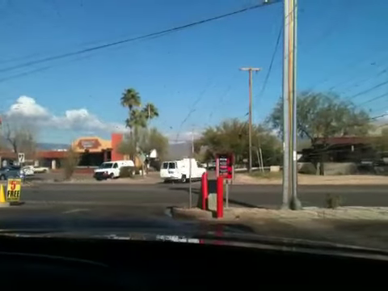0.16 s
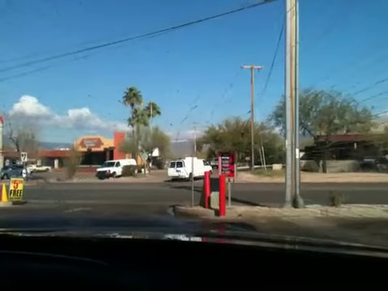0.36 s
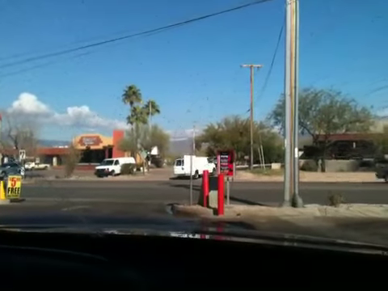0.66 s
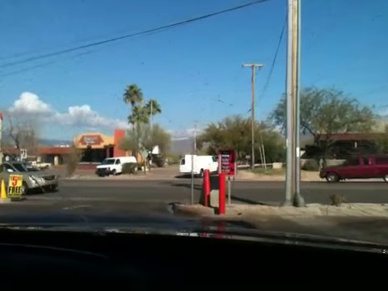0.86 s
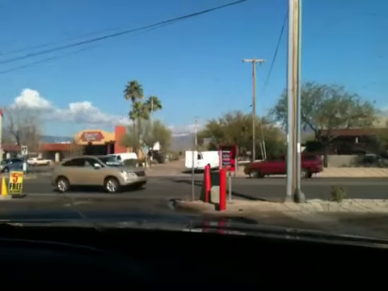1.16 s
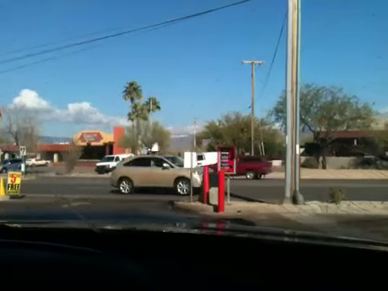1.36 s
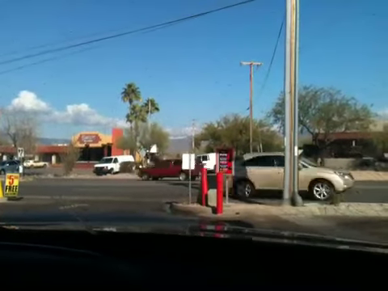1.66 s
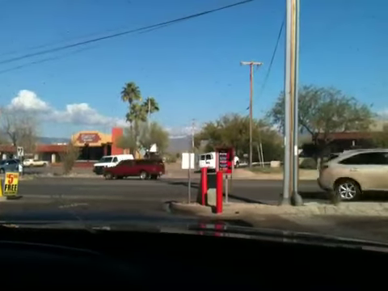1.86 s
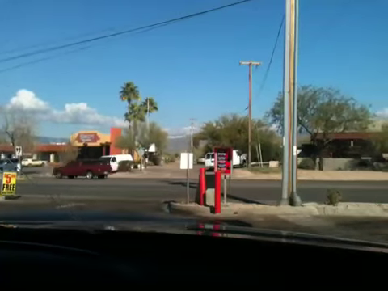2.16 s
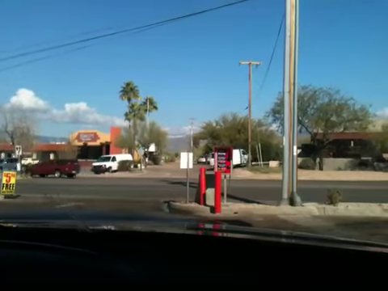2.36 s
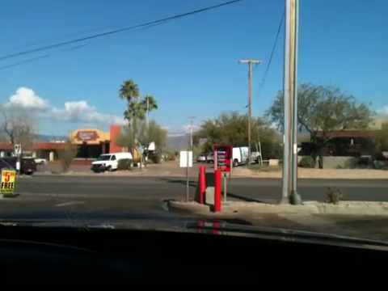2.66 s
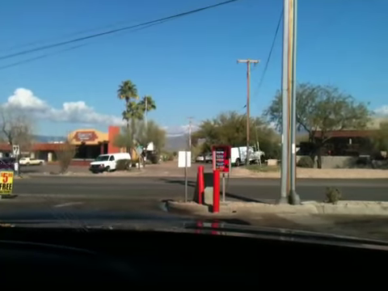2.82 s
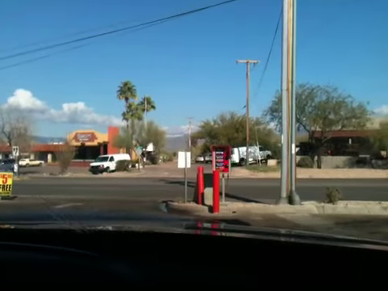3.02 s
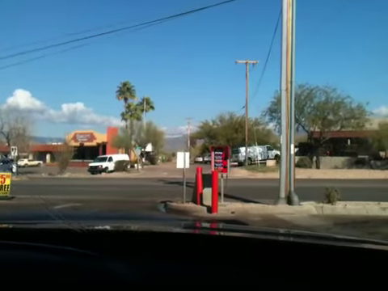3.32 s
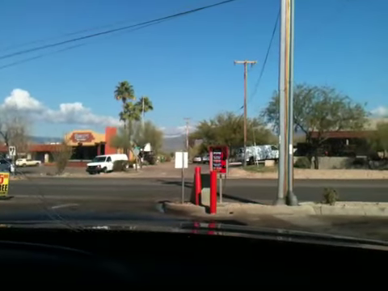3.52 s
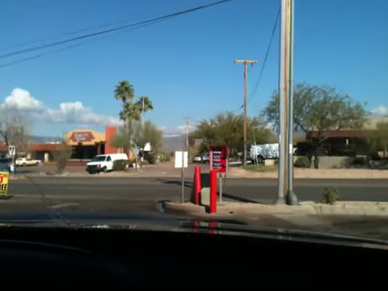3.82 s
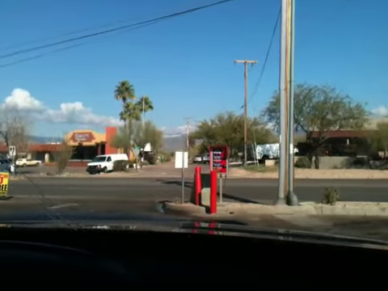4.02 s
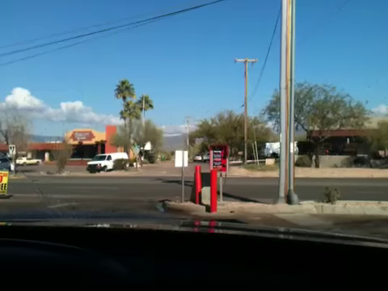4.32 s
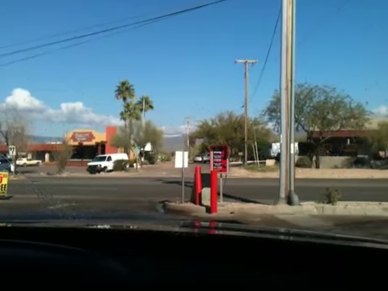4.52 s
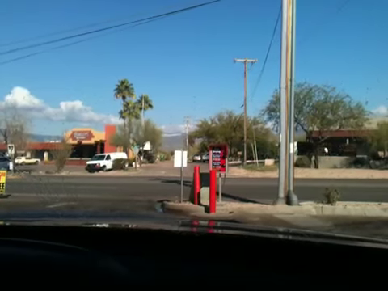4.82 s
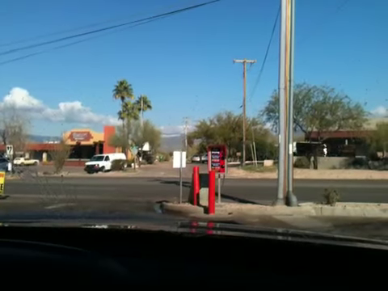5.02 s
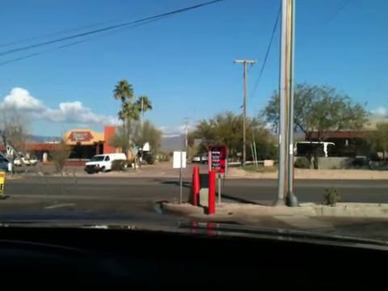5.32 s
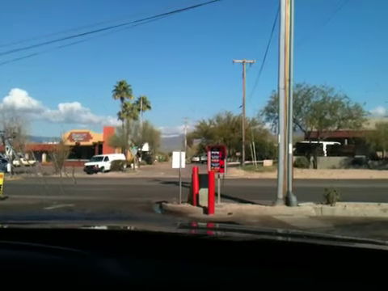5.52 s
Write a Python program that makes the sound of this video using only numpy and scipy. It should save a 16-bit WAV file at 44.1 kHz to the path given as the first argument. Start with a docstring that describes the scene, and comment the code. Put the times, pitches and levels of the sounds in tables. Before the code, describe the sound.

Inside a parked car, a muffled low roar of dryer air rumbles on, small metal jingles briefly, then panels drum louder.

```python
"""Car wash dryer blowers rush over a closed car, heard from the cabin.
From the start: noise-band rumble and rush, resonant roof drumming, seal hiss and a very faint sine whine.
Small metal, like keys, chinks within the first second (noise-struck modes); bright noise puffs come and go.
The roof drums harder from about 2.5 s to the end; a blurred fan tone comes up near 4 s.
One more faint chink, slightly spread, follows shortly after."""
import sys
import numpy as np
from scipy import signal
from scipy.io import wavfile
from scipy.ndimage import uniform_filter1d

SR = 44100
rng = np.random.default_rng(int(sys.argv[2]) if len(sys.argv) > 2 else 0)


def digitize_waveform(pressure):
    """Quantize a signal to 16-bit integers and store it at the path in sys.argv[1].

    Rows of a 2-D input are taken as channels; values are limited to [-1, 1].
    """
    field = np.atleast_2d(pressure).T
    bounded = np.clip(field, -1, 1)
    quanta = np.round(bounded * 32767).astype(np.int16)
    wavfile.write(sys.argv[1], SR, quanta)


N = 250488  # samples

# Large-eddy spectrum: freq_hz, gain_db
RUMBLE_SPECTRUM = [(15, -68.5), (25, -48), (65, -20.5), (94, -13), (113, 1), (167, 0), (212, -7),
                   (260, -0.5), (340, -41.5), (570, -120)]
# Rumble over time: time_s, level_db (90-220 Hz, before tilt and wobbles), tilt_db_per_octave
RUMBLE_CURVE = [(0, -29.5, 1.5), (.45, -30.5, -1.5), (.65, -30.5, -0.5), (.75, -32.5, -2.5),
                (1.15, -34, -1.5), (1.4, -31, -4), (1.75, -32.5, -1), (2.2, -31.5, -1), (3.0, -32, -2),
                (3.7, -32, 2.5), (4.3, -32.5, 1), (5.1, -28.5, 2.5), (5.4, -29.5, -0.5), (5.68, -29.5, 3)]
# Brief level wobbles of the low noise and main panel: centre_s, rumble_change_db, panel_change_db
WOBBLES = [(0.5, 3.5, 0), (0.59, 6, 0), (1.0, 6, 2), (2.52, 5, 2), (3.74, 2.5, 8), (4.04, -4, 8.5),
           (4.42, 5.5, 7), (5.47, 3, 5), (5.58, 2, 4)]
WOBBLE_HALF_WIDTH_S = 0.023  # change in dB is down to 1/e here
# Cabin resonances colouring rumble and rush: centre_hz, width_hz, lift_db
CABIN_MODES = [(110.4, 29, 4.5), (177.2, 19, 6), (443.4, 21, 6), (700, 25, 5), (1010, 40, 0), (1180, 11, 8),
               (1390, 19, 1.5), (2650, 370, -5), (3800, 1200, 6.5)]

# Roof and door panel resonances: centre_hz, width_hz, gain_db
ROOF_MODES = [(178.5, 58, -2.5), (242, 38, -12), (282, 26, -0.5), (340, 34, -1.5), (392.5, 30.3, 2.5),
              (436.5, 22, 0), (498, 34, -7), (536, 41, -9.5), (599, 27, -13), (880, 22, -24.5),
              (933, 28, -15.5)]
# Roof over time: time_s, drumming_db (340-520 Hz), main_panel_db (285-330 Hz, before wobbles)
ROOF_CURVE = [(0.0, -39, -38), (.3, -37.5, -53), (0.7, -42.5, -53), (1.5, -37, -45), (2.0, -41, -42),
              (2.3, -38.5, -35.5), (3.4, -34, -33), (4.0, -32, -29.5), (4.5, -29.5, -32.5),
              (4.9, -28.5, -30.5), (5.15, -31, -34), (5.33, -28, -35), (5.5, -28.5, -28.5),
              (5.68, -28.5, -26.5)]
PANEL_HZ, PANEL_WIDTH_HZ = 307, 25
PANEL_WANDER = 0.018  # rms random pitch drift, as a share of pitch

# Nozzle roar spectrum: freq_hz, gain_db
RUSH_SPECTRUM = [(120, -59), (200, 0), (220, -3.5), (316, 0.5), (362, -13.5), (392, -8.5), (437, -4),
                 (557, -8), (719, -9), (904, -15), (1800, -22.5), (2110, -25.5), (5000, -54), (6500, -68),
                 (11000, -120)]
# Rush over time: time_s, level_db (600-3000 Hz, before tilt), tilt_db_per_octave
RUSH_CURVE = [(0.0, -37, -3), (0.5, -39.5, -0.5), (.95, -39, -.5), (1.35, -40, 2), (1.7, -40, -1),
              (2.5, -40, -0.5), (3.2, -40, 2), (3.9, -41, 1), (4.4, -38.5, 0), (5.0, -38, .5),
              (5.4, -39.5, 1.5), (5.68, -37.5, 1)]

# Seal hiss spectrum: freq_hz, gain_db
HISS_SPECTRUM = [(2060, -4.5), (3500, -2.5), (4700, -8), (6000, -12.5), (7800, -16.5), (10300, -21.5),
                 (14300, -31), (14600, -28.5), (15600, -29.5)]
# Hiss over time: time_s, level_db (5-9 kHz, before tilt), tilt_db_per_octave
HISS_CURVE = [(0.0, -59.5, 1.5), (1.16, -64, -0.5), (2.97, -65.5, -0.5), (4.13, -64.5, -1),
              (4.98, -63.5, -1), (5.62, -63, -1.5)]

FAN_HZ, FAN_WIDTH_HZ = 988, 9
# Blower tone over time: time_s, level_db (950-1020 Hz)
FAN_CURVE = [(0, -65), (3.9, -58), (4.4, -52), (5.0, -51), (5.68, -50)]

# Electronic whine: pitch_hz, rms_db
WHINE_TONES = [(14912, -100), (14971, -91), (15030, -90), (15089, -100), (15622, -104)]

# Ringing modes of the small metal: pitch_hz, offset_db, t60_s
KEY_MODES = [(4400, -1, .012), (5600, -5, .012), (7500, 0, .04), (7950, -1.5, .04), (9200, -4, .015),
             (9900, -2, .015), (10500, 0, .02), (11300, 2, .015), (12020, 3, .06), (12705, -8, .05),
             (14500, -12, .03), (14950, 2, .03), (15300, -12, .03)]
# Mode-group index (0-4) of each row of KEY_MODES
KEY_GROUPS = [0, 0, 0, 0, 1, 1, 1, 1, 2, 3, 4, 4, 4]
# Contacts: start_s, length_s, lowest_db, middle_db, main_db, upper_db, top_db (peaks before offset_db)
CHINKS = [(.04, .02, -80, -80, -62, -78, -80), (.517, .012, -55, -61, -62, -78, -76),
          (.530, .018, -62, -71, -63, -80, -72), (.552, .014, -60, -72, -73, -80, -78),
          (.600, .014, -68, -65, -64, -78, -74), (.613, .012, -66, -73, -66, -78, -69),
          (.627, .012, -68, -70, -64, -70, -70), (.639, .018, -59, -62, -54, -55, -63),
          (.655, .014, -67, -68, -63, -59, -66), (.774, .016, -69, -67, -68, -72, -65),
          (.787, .012, -62, -56, -57, -60, -54), (.795, .012, -51, -58, -56, -59, -49),
          (.804, .01, -55, -59, -65, -63, -49), (.811, .011, -58, -57, -64, -65, -58),
          (.821, .01, -61, -67, -73, -74, -61), (4.275, .025, -82, -74, -67, -72, -80),
          (4.295, .025, -82, -76, -70, -74, -80)]

# Puff spectrum: freq_hz, gain_db
PUFF_SPECTRUM = [(2500, -19), (4500, 0), (7500, 8), (11000, 1), (15500, -11)]
# Short bright noise puffs; the one at 0.79 s belongs to the key clash: time_s, gain_db
PUFFS = [(.516, -60), (.79, -54), (1.885, -59), (3.165, -59), (3.68, -63), (4.375, -58), (5.015, -60)]

MIC_CUTOFF_HZ, RECORDER_CUTOFF_HZ = 74, 15760


def amp(db):
    """Amplitude gain of a level in dB."""
    return 10 ** (np.asarray(db) / 20)


def evened(x):
    """Scale to rms 1."""
    return x / np.sqrt(np.mean(x ** 2) + 1e-20)


def smooth_noise(shape, size):
    """Running mean of white noise along the first axis, rms 1."""
    return evened(uniform_filter1d(rng.standard_normal(shape), size=size, axis=0))


def spectrum_gain(points, hz):
    """Gain of a spectrum table, in dB linear over log frequency."""
    freq_hz, gain_db = np.transpose(points)
    return amp(np.interp(np.log(hz + 1), np.log(freq_hz + 1), gain_db))


def along(table, column):
    """Gain at every sample from a dB column over time."""
    rows = np.array(table)
    return amp(np.interp(np.arange(N) / SR, rows[:, 0], rows[:, column]))


def peak(hz, centre_hz, width_hz):
    """Resonance shape, 1 at its centre and 1/2 at half a width away."""
    return 1 / (1 + (2 * (hz - centre_hz) / width_hz) ** 2)


def turbulence(shape, band_hz, size, patchy_db, flicker_db, swell_db=0, wander=0):
    """Random-phase noise, rms 1 in the band; patches, flicker, swell (rms dB) and pitch drift at random."""
    hop = size // 4
    frames, hz = N // hop + 12, np.fft.rfftfreq(size, 1 / SR)
    real, imag = rng.standard_normal((2, len(hz), frames))
    patches = evened(uniform_filter1d(smooth_noise((len(hz), frames), size=8), size=6, axis=1))
    flicker = smooth_noise(frames, size=3)
    slow_frames = SR // 4 // hop  # about 0.25 s
    swell = smooth_noise(frames, slow_frames)
    drift = smooth_noise(frames, slow_frames)

    power = shape(hz) ** 2
    in_band = (hz > band_hz[0]) & (hz < band_hz[1])
    band_share = np.sum(power[in_band]) / np.sum(power)
    gain = shape(hz[:, None] * (1 + wander * drift))
    level_db = patchy_db * patches + flicker_db * flicker + swell_db * swell
    z = (real + 1j * imag) * gain * amp(level_db)
    noise = signal.istft(z, nperseg=size, noverlap=size - hop)[1][size:size + N]
    return evened(noise) / np.sqrt(band_share)


def shaped(x, table, pivot_hz, reach_octaves):
    """Level and brightness over time: the spectrum tips about the pivot, flat beyond the reach."""
    hz, time_s, z = signal.stft(x, SR, nperseg=2048)
    rows = np.array(table)
    octaves = np.clip(np.log2((hz + 1) / pivot_hz), -reach_octaves, reach_octaves)
    tilt_db = np.outer(octaves, np.interp(time_s, rows[:, 0], rows[:, 2]))
    tilted = signal.istft(z * amp(tilt_db), nperseg=2048)[1][:N]
    return along(table, column=1) * tilted


def cabin(hz):
    """Cabin air and trim: resonant lifts and a dip on a flat response."""
    return amp(sum(db * peak(hz, f, w) for f, w, db in CABIN_MODES))


def wobbles(column):
    """Gain of the brief level wobbles, each a bell in dB."""
    t = np.arange(N) / SR
    change_db = sum(row[column] * np.exp(-((t - row[0]) / WOBBLE_HALF_WIDTH_S) ** 2) for row in WOBBLES)
    return amp(change_db)


def rumble():
    """Large eddies press on the whole body: low noise coloured by the cabin."""
    def shape(hz):
        return spectrum_gain(RUMBLE_SPECTRUM, hz) * cabin(hz)
    eddies = turbulence(shape, (90, 220), size=4096, patchy_db=0.5, flicker_db=0.27)
    return wobbles(column=1) * shaped(eddies, RUMBLE_CURVE, pivot_hz=145, reach_octaves=1)


def roof():
    """Panels ring on the buffeting: noise in narrow resonances; the main panel has its own level."""
    def modes(hz):
        power = sum(amp(2 * db) * peak(hz, f, w) ** 1.7 for f, w, db in ROOF_MODES)  # steep skirts
        return np.sqrt(power)

    def main_mode(hz):
        return peak(hz, PANEL_HZ, PANEL_WIDTH_HZ)
    drumming = turbulence(modes, (340, 520), size=8192, patchy_db=0.7, flicker_db=0, wander=PANEL_WANDER)
    panel = turbulence(main_mode, (285, 330), size=8192, patchy_db=0.5, flicker_db=0.3, wander=PANEL_WANDER)
    main_panel = along(ROOF_CURVE, column=2) * wobbles(column=2) * panel
    return along(ROOF_CURVE, column=1) * drumming + main_panel


def rush():
    """Nozzle roar dulled by the glass: noise falling towards the treble, coloured by the cabin."""
    def shape(hz):
        return spectrum_gain(RUSH_SPECTRUM, hz) * cabin(hz)
    roar = turbulence(shape, (600, 3000), size=4096, patchy_db=1.22, flicker_db=0.25, swell_db=0.19)
    return shaped(roar, RUSH_CURVE, pivot_hz=1000, reach_octaves=0.46)


def seals():
    """Air whipping past the window seals: high noise with fast patches."""
    def shape(hz):
        return spectrum_gain(HISS_SPECTRUM, hz)
    hiss = turbulence(shape, (5000, 9000), size=512, patchy_db=1.07, flicker_db=0.5, swell_db=0.3)
    return shaped(hiss, HISS_CURVE, pivot_hz=6500, reach_octaves=2.5)


def fan():
    """Blade tone blurred into a narrow noise band, coming up as a blower nears."""
    def shape(hz):
        return peak(hz, FAN_HZ, FAN_WIDTH_HZ)
    tone = turbulence(shape, (950, 1020), size=8192, patchy_db=0.5, flicker_db=1.5, wander=0.0037)
    return along(FAN_CURVE, column=1) * tone


def whine():
    """Thin steady sines of some electronics, at random phases."""
    t = np.arange(N) / SR
    return sum(np.sqrt(2) * amp(db) * np.sin(2 * np.pi * (hz * t + rng.random())) for hz, db in WHINE_TONES)


def keys():
    """Small metal: each swelling, fading rattle of noise contacts rings the same decaying modes."""
    out, t = np.zeros(N + SR), np.arange(SR // 8) / SR
    for start_s, length_s, *group_db in CHINKS:
        swell = np.sin(np.pi * np.clip(t / length_s, 0, 1) ** 0.73) ** 2
        at = round(start_s * SR)
        for (hz, offset_db, t60_s), group in zip(KEY_MODES, KEY_GROUPS):
            roughness = amp(4.0 * smooth_noise(len(t), size=60))
            contacts = swell * rng.standard_normal(len(t)) * roughness
            mode = amp(-60 * t / t60_s) * np.sin(2 * np.pi * hz * t)
            ring = signal.fftconvolve(contacts, mode)[:len(t)]
            out[at:at + len(t)] += amp(offset_db + group_db[group]) * ring / abs(ring).max()
    return out[:N]


def puffs():
    """Short bright noise puffs, rising then dying away; the one at 0.79 s belongs to the key clash."""
    t, envelope = np.arange(N) / SR, np.zeros(N)
    for time_s, gain_db in PUFFS:
        rises = np.maximum(t - time_s + 0.007, 0) / 0.014  # starts 7 ms early, 14 ms rise
        envelope += amp(gain_db) * rises * np.exp(-rises)

    def shape(hz):
        return spectrum_gain(PUFF_SPECTRUM, hz)
    return envelope * turbulence(shape, (5500, 11000), size=256, patchy_db=4, flicker_db=2)


def scene():
    """Sum of all sources, one channel."""
    return (rumble() + roof() + rush() + seals() + fan() + whine() + keys() + puffs())[None]


def record(dry):
    """Small microphone loses the deep bass; the recorder limits the treble."""
    bass_cut = signal.butter(2, MIC_CUTOFF_HZ, "high", fs=SR, output="sos")
    thin = signal.sosfilt(bass_cut, dry)
    treble_cut = signal.firwin(511, RECORDER_CUTOFF_HZ, window=("kaiser", 9), fs=SR)
    return signal.oaconvolve(thin, treble_cut[None], "same")


dry = scene()
out = record(dry)
digitize_waveform(out)
```